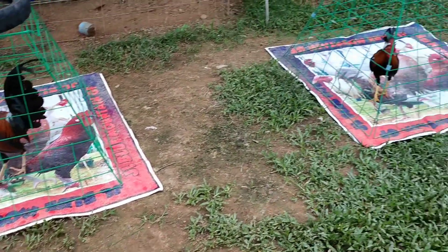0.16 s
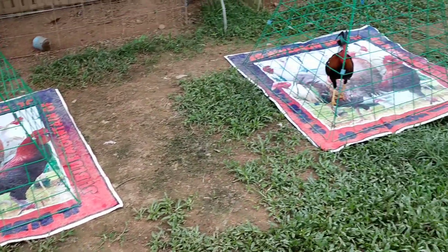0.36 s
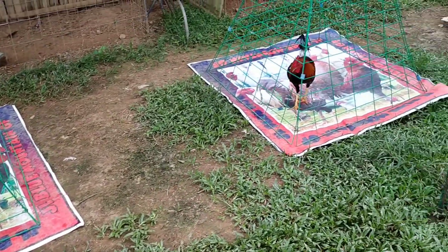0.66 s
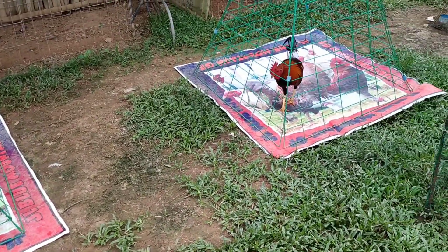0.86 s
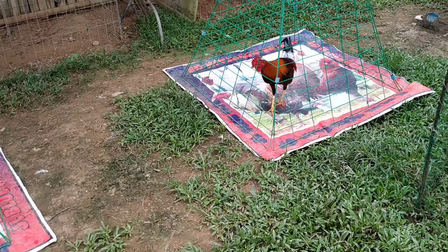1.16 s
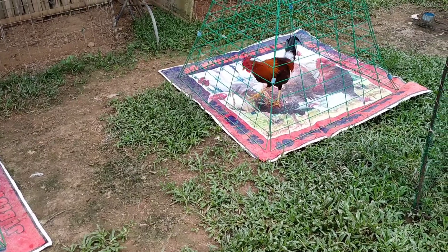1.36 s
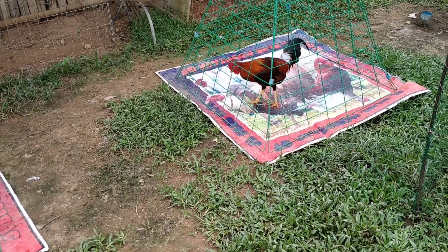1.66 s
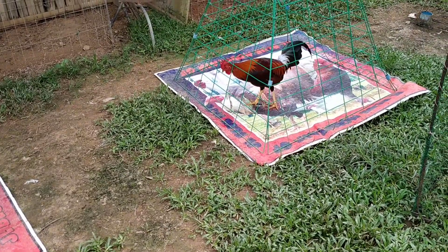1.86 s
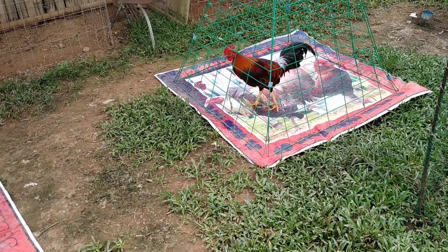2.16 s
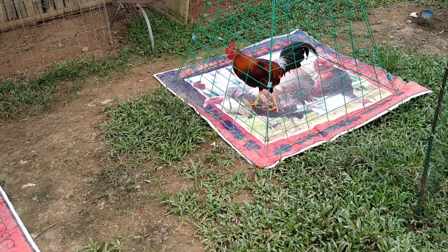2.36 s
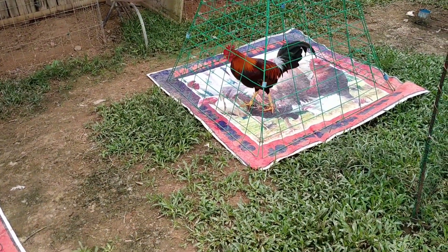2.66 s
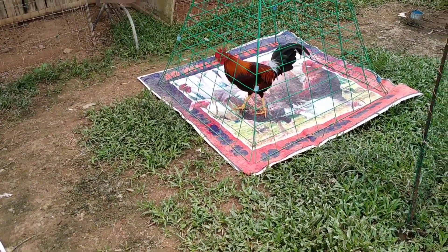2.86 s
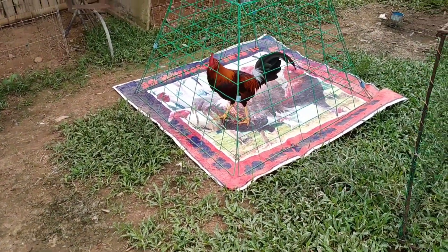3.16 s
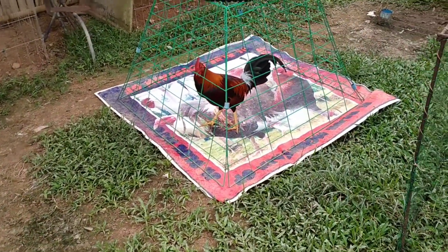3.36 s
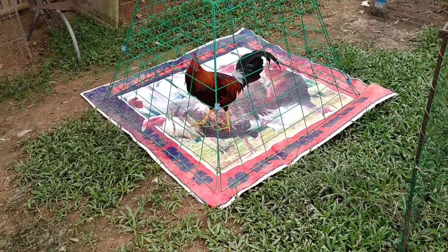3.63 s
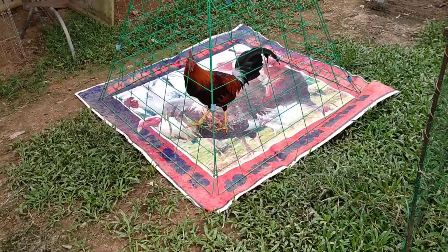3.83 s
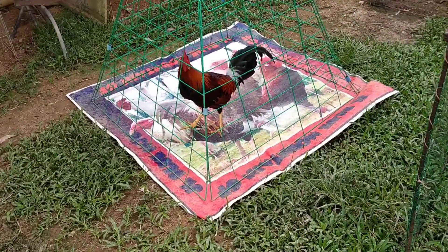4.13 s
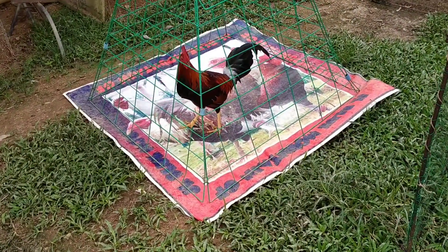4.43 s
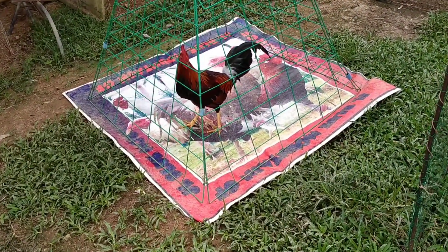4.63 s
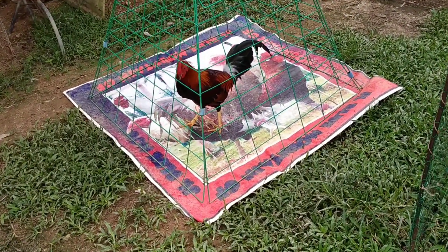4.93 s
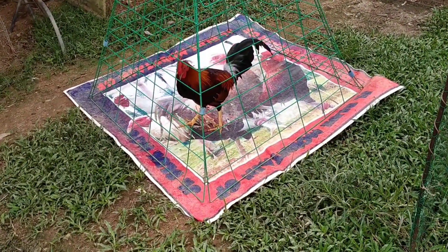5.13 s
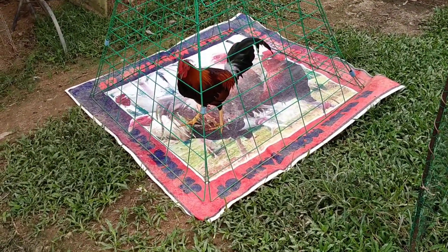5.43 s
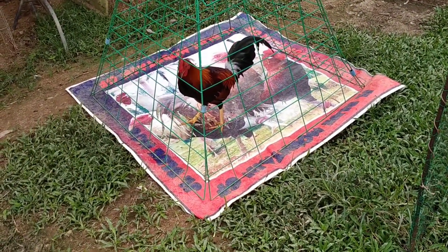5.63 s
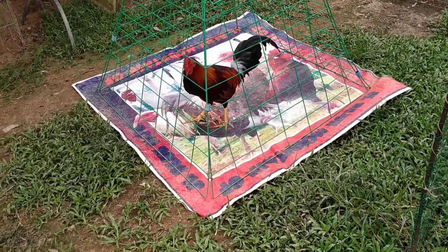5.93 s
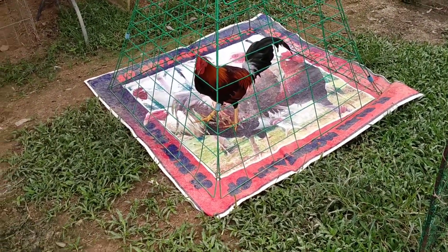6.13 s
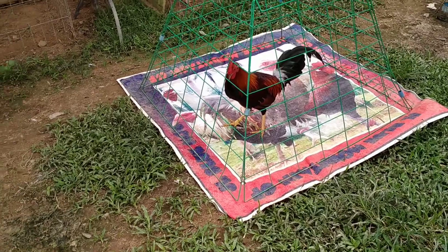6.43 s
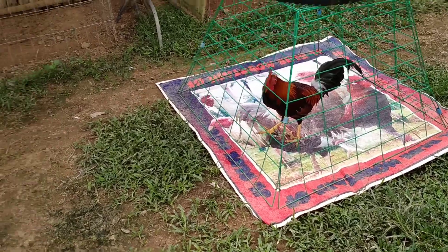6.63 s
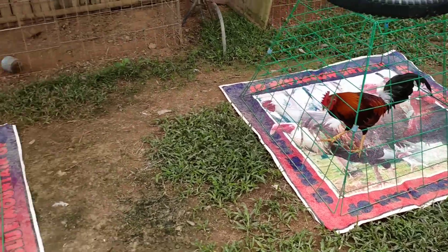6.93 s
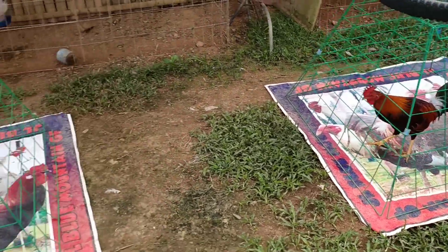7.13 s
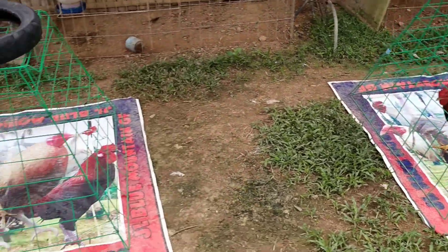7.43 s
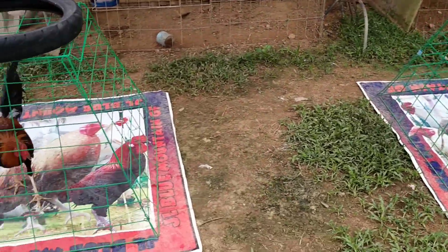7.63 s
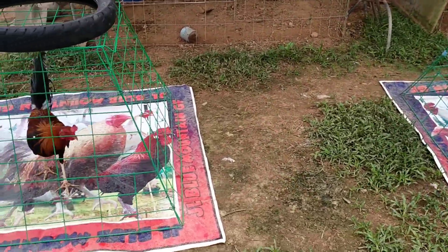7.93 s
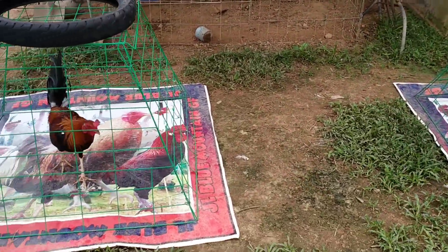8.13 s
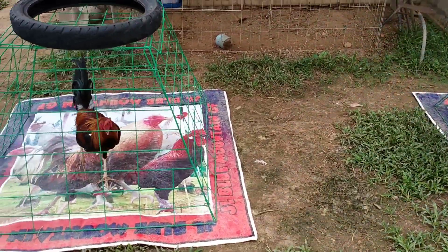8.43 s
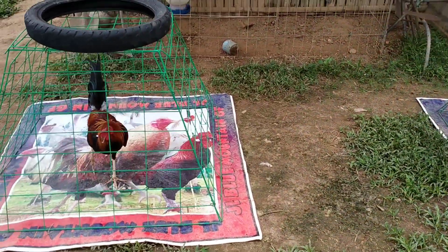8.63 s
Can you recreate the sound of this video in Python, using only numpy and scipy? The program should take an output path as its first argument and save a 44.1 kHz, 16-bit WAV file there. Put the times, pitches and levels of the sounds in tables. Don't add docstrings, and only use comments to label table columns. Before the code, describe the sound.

Outdoor yard, phone microphone a few metres from the birds, steady high insect hiss over faint air and low wind rumble. At 0.1 s a light wire knock and feathery swish, with a thin rising chirp; a distant clear fowl call at 0.5-0.8 s. From 0.8 to 2.8 s a rooster crows once, very loud: rasping, fluttering opening, a hoarse unstable middle, a clear ringing held note around 2 s, then a drop in pitch, with a short diffuse echo. Quiet follows, with soft clucks near 3 s, a dry snap and wing rustle at 3.3-3.5 s, low hen groans and short barks from 3.5 to 4.9 s. Small birds chirp upward at 4.7, 5.4, 6.6 and 7.6 s. Soft hoarse clucks repeat from 5.2 to 7.6 s, with occasional dull thumps. From 7.1 s distant fowl calls grow clearer, a nearer low groan runs 8.2-8.8 s, and small knocks land near 8.5 s.

```python
import sys
import numpy as np
from scipy import signal
from scipy.fft import rfft, irfft, next_fast_len
from scipy.io import wavfile
from scipy.ndimage import uniform_filter1d, minimum_filter1d

SR = 44100
rng = np.random.default_rng(int(sys.argv[2]) if len(sys.argv) > 2 else 0)


def waveform_to_disk(signal):
    frames = np.transpose(np.atleast_2d(signal))
    scaled = np.clip(frames, -1, 1) * 32767
    samples = np.round(scaled).astype(np.int16)
    wavfile.write(sys.argv[1], SR, samples)


def boost(x):
    u = np.asarray(x, float) / 20
    return 10 ** u


N = 387198

# (time [s], pitch [Hz], clear tone [dB], hoarse rasp [dB])
CROW_OPENING = [(.8, 897, -21, -11.5), (.93, 890, -22, -14.5), (.97, 930.6, -13, -17),
                (1.02, 969.3, -11.5, -20), (1.045, 905, -11, -17), (1.085, 1008, -11.5, -49),
                (1.12, 990.5, -9.5, -24.5), (1.155, 878, -22, -21), (1.2, 864, -37, -26)]
CROW_HOARSE = [(1.19, 865, -25, -20), (1.25, 950, -14, -15), (1.29, 912, -11, -18.5),
               (1.36, 945.7, -15.5, -16), (1.48, 963, -12.5, -21.5), (1.6, 958, -21, -20),
               (1.7, 932.6, -21.5, -14.5), (1.79, 905, -14, -12.5)]
CROW_HELD = [(1.75, 900, -16, -20.5), (1.8, 910.7, -14.5, -24.5), (1.88, 921.6, -12, -34),
             (1.97, 916.5, -12, -25.5), (2.04, 873, -19, -47)]
CROW_CLEAR = [(2.02, 869.5, -15, -29), (2.04, 870.7, -14, -23.5), (2.12, 862, -9, -31.5),
              (2.2, 851.6, -13, -23), (2.28, 843, -10, -57), (2.4, 823.4, -20, -60),
              (2.45, 816, -19.5, -40), (2.49, 788, -25, -32)]
CROW_SECOND_MEMBRANE = [(2.22, 437.4, -29.5, -16.5), (2.26, 442, -23, -33), (2.42, 439.9, -25.5, -52),
                        (2.46, 434.2, -25.5, -26.5), (2.5, 436, -26.5, -42), (2.57, 422, -28, -43),
                        (2.6, 419, -39, -45)]
CROW_FALL = [(2.59, 790, -22, -24), (2.655, 725, -18, -24), (2.68, 720, -14, -40), (2.715, 700, -17, -30),
             (2.765, 590, -31, -29), (2.79, 545, -46, -42)]
# (multiple of pitch [1], level [dB])
OPENING_ORDERS = [(1, -19.5), (2, 2), (3, -29), (4, -42), (5, -35), (6, -31), (7, -31)]
HOARSE_ORDERS = [(1, -7.5), (2, 1.5), (3, -30), (4, -32.5), (5, -35), (6, -31.5), (7, -27)]
HELD_ORDERS = [(1, -20), (2, 5.5), (3, -22), (4, -19.5), (5, -37), (6, -43), (7, -30), (10, -80)]
CLEAR_ORDERS = [(1, -8.5), (2, -1.5), (3, -16.5), (4, -33), (5, -22), (6, -42), (7, -35), (8, -47),
                (10, -66), (12, -37.5), (18, -42)]
SECOND_ORDERS = [(1, -33), (2, 3.5), (3, -1.5), (4, 10.5), (5, -3), (6, -9.5), (7, -14), (8, -25),
                 (10, -52), (13, -18.5), (18, -36)]
FALL_ORDERS = [(1, 0.5), (2, -10.5), (3, -15), (4, -17), (6, -43), (7, -47), (8, -24.5), (9, -33)]
# (multiple of pitch [1], level [dB])
HALF_ORDERS = [(1.5, -32), (2.5, -40), (3.5, -30), (4.5, -54), (5.5, -36.5), (7.5, -31), (9.5, -65),
               (13.5, -48), (17.5, -46)]
# (start [s], end [s], first pitch [Hz], last pitch [Hz], level [dB])
SIDE_TONES = [(.8, 0.823, 2160, 2507, -11), (0.815, 0.979, 1285, 1269, -23),
              (1.292, 1.396, 1210, 1430, -21), (1.301, 1.407, 573, 725, -37.5),
              (1.852, 2.032, 1768, 1734, -14.5), (2.055, 2.191, 1272, 1167, -26),
              (1.8, 2.053, 875, 878, -23),
              (0.962, 1.007, 987, 978, -26.5), (1.033, 1.079, 869, 1025, -21.5),
           (1.112, 1.155, 1010, 850, -20.5), (1.01, 1.039, 2414, 2290, -17), (1.15, 1.2, 1200, 1330, -31),
           (1.198, 1.25, 721, 950, -23), (1.404, 1.45, 1252, 1233, -22.5),
           (1.695, 1.742, 1150, 1260, -21.5), (1.721, 1.76, 720, 763.4, -20.5),
           (1.86, 1.93, 2180, 2170, -32), (1.862, 1.914, 470, 490, -45.5), (2.02, 2.046, 722, 790, -24),
           (2.598, 2.66, 1965, 1940, -24), (2.712, 2.755, 1980, 1900, -26.5), (2.19, 2.24, 1200, 1300, -28),
           (.82, .93, 1800, 1750, -18), (.86, .95, 2370, 2390, -19), (.81, .838, 3420, 3420, -30),
           (.828, .86, 2620, 2600, -22), (.965, 1.03, 2800, 2900, -31), (.965, 1.0, 3800, 3900, -40),
           (1.145, 1.175, 2420, 2380, -24), (1.2, 1.245, 2380, 2450, -24), (1.8, 1.86, 2300, 2250, -22),
           (1.95, 2.0, 2250, 2200, -27), (1.62, 1.66, 3400, 3380, -33), (1.74, 1.77, 3330, 3400, -31)]
SUM_TONES = [(1.83, 2.013, 5250, 5230, -53), (1.86, 1.994, 5620, 5600, -60), (1.863, 2.01, 6140, 6100, -50),
             (1.897, 2.033, 4400, 4330, -50)]
# (time [s], level [dB])
SWOOPS = [
    (1.54, -23),
    (1.61, -25.5),
    (1.67, -23.5),
    (1.72, -41),
]
SWOOP_S, SWOOP_FROM_HZ, SWOOP_TO_HZ = 0.044, 725, 890

# (frequency [Hz], level [dB per Hz])
CROW_THROAT = [(350, -28.5), (560, -33.5), (810, 2.5), (1050, -14.5), (1250, -3), (1520, -6.5), (1800, 5),
               (2350, -1.5), (2750, -17), (3400, -13), (3900, -42.5), (5600, -19.5), (7000, -32),
               (15000, -35.5)]
HEN_THROAT = [(290, -16.5), (681, -20.5), (850, -12.5), (1050, -4), (1500, -7), (2050, -30), (3500, -33),
              (4550, -51)]
FAR_THROAT = [(350, -18), (650, -3.5), (1200, 6.5), (2000, -2.5), (2400, -16.5), (2950, -3), (3250, -18.5),
              (4500, -49)]
# (frequency [Hz], level [dB])
HEN_VOICE = [(240, 1), (400, 0.5), (560, -10), (740, -5.5), (1100, 8), (1300, 2), (1600, -29), (3400, -31)]
NEAR_HEN_VOICE = [(240, 8), (370, -18.5), (740, -2), (1100, -0.5), (1450, -25), (2200, -22), (3400, -29)]
SHED_THROAT = [(500, -16), (670, -10), (1320, 3), (2000, -6), (2650, -31), (3300, -36)]
# (start [s], length [s], pitch [Hz], clear tone [dB], hoarse rasp [dB])
GROANS = [
    (3.855, 0.65, 394, -39.5, -31),
]
LEAD_INS = [
    (3.55, .29, 284.3, -41.5, -36.5),
    (7.93, .26, 263, -41.5, -37.5),
]
BARKS = [(3.45, 0.062, 321, -47.5, -40), (4.544, 0.085, 357, -44.5, -29), (4.62, 0.056, 320.4, -41, -45),
         (4.684, 0.077, 350, -39, -33.5), (4.81, 0.078, 327, -46, -47), (4.86, 0.046, 349, -42, -29)]
# (share of length [1], pitch ratio [1], tone [dB], rasp [dB])
GROAN_SHAPE = [(0, .92, 1.5, -5), (.18, .89, 4.5, -17), (0.229, .88, 5, -18), (.31, .98, 4, -6),
               (.4, .96, 0.5, -7), (.55, 1.01, 2.5, -4.5), (.7, 1.0, -2.5, -1), (0.922, .98, 0.5, -0.5),
               (1, .94, -13, -22)]
LEAD_SHAPE = [(0, 1.03, -3, 2.5), (0.449, .99, 1, -14), (.72, 1.0, -1.5, -2.5), (1, 1.4, -1.5, -2)]
BARK_SHAPE = [(0, 0.88, 5, -5), (0.25, 1.06, 4, 0), (0.6, 1.0, -5, 0), (.9, .92, 1, -3.5),
              (1.05, .86, -2, -22)]
# (time [s], pitch [Hz], clear tone [dB], hoarse rasp [dB])
FIRST_GROAN = [(0, 401, -47, -32), (.05, 439, -34, -30.5), (.1, 400.4, -51, -35.5), (.14, 420, -39.5, -31),
               (.22, 381, -56, -37.5), (.27, 371.8, -33.5, -30.5), (.42, 393.4, -39.5, -32),
               (.6, 390.6, -39.5, -33), (.7, 366, -47, -44)]
NEAR_GROAN = [(8.205, 362, -31, -47), (8.418, 369, -32, -39), (8.5, 391, -32, -67), (8.62, 365, -32.5, -32),
              (8.79, 364, -28.5, -43)]
# (start [s], end [s], first pitch [Hz], last pitch [Hz], level [dB])
FAR_CLEAR = [
    (8.365, 8.478, 671.7, 726, -21),
]
FAR_HOARSE = [(7.141, 7.181, 432, 427, -35), (7.363, 7.45, 813, 984, -40), (7.455, 7.49, 1016, 1018, -34),
              (7.495, 7.714, 968, 827, -36.5), (7.72, 7.756, 670, 679, -24), (8.26, 8.295, 480, 459, -19.5),
              (8.385, 8.485, 351.6, 357.7, -27.5), (8.075, 8.09, 955, 1010, -22.5),
              (7.95, 7.985, 983, 876, -29), (7.994, 8.034, 691, 697, -23), (8.028, 8.078, 924, 909, -26.5),
              (8.63, 8.668, 491.6, 471, -19), (8.7, 8.745, 482, 447, -22)]
WHISTLES = [(0.472, 0.801, 1126, 1120, -26), (0.61, 0.797, 940, 930, -45), (0.6, .797, 1710, 1800, -48.5),
            (3.365, 3.43, 1275, 970, -56), (3.385, 3.45, 1400, 1840, -62),
            (7.748, 7.947, 1173, 1119, -20.5), (8.083, 8.12, 1188, 1153, -18.5),
            (8.325, 8.356, 1740, 1770, -33), (8.299, 8.322, 1120, 1000, -20.5),
            (8.69, 8.708, 1900, 1000, -31), (8.145, 8.17, 1369, 1290, -37), (8.088, 8.13, 2400, 2340, -41),
            (.5, 0.72, 3375, 3362, -53)]
SHED_CALLS = [(6.345, 6.4, 637, 620, -33.5), (6.903, 6.93, 717, 634, -27), (6.974, 7.008, 666, 651, -30.5),
              (7.036, 7.126, 665, 669, -35)]
# (multiple of pitch [1], level [dB])
WHISTLE_ORDERS = [(1, 0.5), (2, -28), (3, -40)]
CLEAR_RASP_DB, HOARSE_RASP_DB = -25, -7.5

# (time [s], peak level [dB])
CLUCKS = [(2.965, -37.5), (3.24, -32), (5.158, -30.5), (5.381, -28.5), (5.673, -30), (5.916, -29),
          (6.206, -31), (6.518, -23.5), (6.77, -29), (7.034, -32), (7.336, -27), (7.589, -28)]
# (frequency [Hz], width [Hz], level [dB])
CLUCK_THROAT = [(715, 38, 3.5), (950, 120, -12.5), (1216, 31, 6), (1460, 490, -11.5), (2490, 71, -10)]
CLUCK_T60_S = 0.17
# (time [s], peak level [dB], pitch [Hz], overtone tilt [dB], fade T60 [s])
PIPS = [(5.719, -43, 304.6, 1.5, 0.025), (6.075, -38, 286, -2.5, 0.0084), (6.12, -43.5, 330, 0, 0.061),
        (6.779, -36, 521, -9, 0.017), (6.92, -43, 328, -2, 0.14), (7.82, -35, 356, -2, 0.046)]

# (time [s], peak level [dB], ring [Hz])
PECKS = [(0.1431, -24, 1240), (3.3303, -40, 2510), (4.2894, -25, 1027), (5.0559, -22.5, 1290),
         (8.5215, -29, 1135), (8.5594, -28, 1110)]
THUMPS = [(4.089, -37, 356), (6.239, -22, 128), (6.859, -25, 127), (8.469, -18.5, 50), (8.549, -23, 80.7)]
PECK_T60_S, THUMP_T60_S = 0.041, 0.018
# (time [s], peak level [dB])
TICKS = [
    (3.330, -27),
    (5.108, -42),
    (5.56, -41),
    (6.861, -38),
]

# (start [s], end [s], first pitch [Hz], last pitch [Hz], level [dB])
CHIRPS = [(0.177, 0.329, 4560, 6680, -44), (7.25, 7.37, 14300, 14600, -45), (3.4, 3.42, 3880, 2100, -32),
          (4.653, 4.745, 4520, 5800, -40.5), (5.376, 5.493, 4350, 6320, -36.5),
          (6.557, 6.683, 4010, 6670, -39), (7.538, 7.59, 4060, 4170, -43), (7.576, 7.655, 4200, 5570, -35),
          (7.647, 7.693, 5450, 6600, -36)]
# (time [s], level [dB])
TWEETS = [(4.515, -39), (4.745, -39), (5.277, -45), (5.305, -44), (5.498, -39)]
TWEET_S, TWEET_FROM_HZ, TWEET_TO_HZ = 0.018, 5250, 4520

# (start [s], length [s], centre [Hz], level [dB], width [octaves])
AIR_RUSHES = [(0.121, 0.4, 1930, -32.5, 0.21), (0.792, 0.15, 6500, -33, 0.11),
              (3.455, 0.065, 1230, -38, 0.44), (3.512, 0.12, 1760, -32, 0.71),
              (6.13, 0.25, 2090, -43, 0.88), (7.152, 0.47, 1690, -46.5, 0.18),
              (2.75, 0.51, 1750, -51, 0.021), (2.751, 0.64, 715, -55.5, 0.052),
              (6.329, 0.48, 1820, -49.5, 0.094), (6.5, 0.45, 1430, -51.5, .05),
              (7.584, 0.2, 1770, -40, 0.033)]
# (share of length [1], level [dB])
RUSH_SHAPE = [(0, -7.5), (.35, 0), (.65, -4), (1, -19)]

# (frequency [Hz], level [dB per Hz])
INSECTS = [(4500, -30), (5230, -22), (6300, -13), (7150, 6), (9500, 2.5), (11300, 8.5), (12500, -8),
           (15600, -17.5)]
AIR = [(88, -23), (150, -5.5), (210, -15), (477, 1.5), (1620, 10.5), (3680, -4), (6250, -1), (7000, 1.5)]
RUMBLE = [(8.8, -38), (15, 4.5), (40, -5), (65, -7), (128, -7), (300, -15), (390, -16), (660, -120)]
CRICKET = [(4300, -22), (4800, -10), (5300, 1.5), (5800, -2), (6300, -22)]
INSECT_DB, AIR_DB, RUMBLE_DB, CRICKET_DB = -38, -46.5, -50, -62.5
# (time [s], gain [dB])
FACING = [(.8, 2), (2.9, -5), (4.3, -4.5), (5.8, -8), (7.3, 1), (8.2, -0.5), (8.78, -1)]
AIR_SHARE, RUMBLE_SHARE = 0.48, 0.6
DUCK_FROM_DB, DUCK_RELEASE_S = -23.5, 0.19
INSECT_DUCK, AIR_DUCK, RUMBLE_DUCK = 0.21, -0.33, 0.72
ECHO_T60_S, ECHO_DB = .32, -10


def unit(x):
    return x / np.sqrt(np.mean(x ** 2) + 1e-18)


def curve(points, hz):
    f, db = np.transpose(points)
    return np.interp(np.log(np.maximum(hz, 1)), np.log(f), db, left=-90, right=-90)


def colour(x, points):
    size = next_fast_len(len(x))
    gain = boost(curve(points, np.fft.rfftfreq(size, 1 / SR)))
    return unit(irfft(rfft(x, size) * gain, size)[:len(x)])


def walk(n, rate):
    k = max(int(SR / rate), 1)
    held = np.repeat(rng.standard_normal(n // k + 1), k)
    return 1.3 * uniform_filter1d(uniform_filter1d(held, k), k)[:n]


def unroll(table, fade_s=0.0029):
    s, *columns = np.transpose(table)
    t = np.arange(max(int(s[0] * SR), 0), min(int(s[-1] * SR), N)) / SR
    edge = np.clip(np.minimum(t - s[0], s[-1] - t) / fade_s, 0, 1)
    return int(round(t[0] * SR)), edge, [np.interp(t, s, c) for c in columns]


def add(out, start, x):
    out[start:start + len(x)] += x[:len(out) - start]


def yard(birds):
    facing_db = np.interp(np.arange(N) / SR, *np.transpose(FACING))
    power = uniform_filter1d(birds ** 2, size=5000, origin=2300)
    over_db = np.maximum(10 * np.log10(power + 1e-9) - DUCK_FROM_DB, 0)
    keep = np.exp(-1 / (max(DUCK_RELEASE_S, .05) * SR))
    over_db = np.maximum(over_db, signal.lfilter([1 - keep], [1, -keep], over_db))
    insect_db = INSECT_DB + facing_db - INSECT_DUCK * over_db + .5 * walk(N, 16)
    air_db = AIR_DB + AIR_SHARE * facing_db - AIR_DUCK * over_db + 0.3 * walk(N, 6.7)
    rumble_db = RUMBLE_DB + RUMBLE_SHARE * facing_db - RUMBLE_DUCK * over_db + 2.8 * walk(N, 8.4)
    cricket_db = CRICKET_DB + 4.2 * walk(N, 9)
    noise = rng.standard_normal((4, N))
    insects = colour(noise[0], INSECTS) * boost(insect_db)
    air = colour(noise[1], AIR) * boost(air_db)
    rumble = colour(noise[2], RUMBLE) * boost(rumble_db)
    cricket = colour(noise[3], CRICKET) * boost(cricket_db)
    return insects + cricket + air + rumble


def wings():
    out = np.zeros(N)
    for s, length, hz, peak_db, octaves in AIR_RUSHES:
        swell = np.array(RUSH_SHAPE) * [length, 1] + [s, peak_db]
        start, edge, (db,) = unroll(swell, fade_s=0.011)
        grain = rng.standard_normal(len(db)) * boost(2.0 * walk(len(db), 159.0))
        band = [(hz * 2 ** (octaves * k), -7.0 * abs(k)) for k in range(-3, 4)]
        add(out, start, edge * boost(db + 2.5) * colour(grain, band))
    return out


def echo(x):
    t = np.arange(SR // 2) / SR
    tail = colour(rng.standard_normal(len(t)), [(200, -8.5), (800, -16.0), (3000, -9.0), (9000, -5.5)])
    tail = tail * boost(-60 * t / ECHO_T60_S) * (t > .012)
    return signal.fftconvolve(x, tail / np.sqrt(np.sum(tail ** 2)))[:N] * boost(ECHO_DB)


def pecks():
    out, t = np.zeros(N), np.arange(SR // 10) / SR
    for hits, t60 in [(PECKS, PECK_T60_S), (THUMPS, THUMP_T60_S)]:
        fade = boost(-60 * t / max(t60, .005))
        for s, db, hz in hits:
            ring = np.sin(2 * np.pi * hz * t)
            band = [(hz / 3, -20), (hz, 0), (3 * hz, -8), (6 * hz, -25)]
            crack = colour(rng.standard_normal(len(t)), band)
            add(out, int(s * SR), boost(db) * fade * (.5 * ring + 0.31 * crack))
    for s, db in TICKS:
        add(out, int(s * SR), boost(db) * boost(-60 * t / 0.005) * rng.standard_normal(len(t)))
    return out


def songbird():
    out = np.zeros(N)
    tweets = [(s, s + TWEET_S, TWEET_FROM_HZ, TWEET_TO_HZ, db) for s, db in TWEETS]
    for s0, s1, hz0, hz1, peak_db in CHIRPS + tweets:
        start, edge, (hz, db) = unroll([(s0, hz0, peak_db), (s1, hz1, peak_db - 6.5)])
        n = len(hz)
        step = np.arange(n) / SR * 38 % 1
        trill = boost(db + 1 * walk(n, 140)) * (1 - 0.61 * np.cos(np.pi * step) ** 2)
        waver = 1 + 0.0096 * np.sin(2 * np.pi * step) + 0.016 * walk(n, 212.4)
        add(out, start, edge * trill * np.sin(2 * np.pi * np.cumsum(hz * waver) / SR))
    return out


def rasp(hz, throat, jitter, throb_db, beat_hz, side_share):
    n = len(hz)
    cycles = np.cumsum(hz * np.exp(jitter * walk(n, 700)) / SR)
    closures = np.diff(np.floor(cycles), prepend=0) * boost(3.0 * rng.standard_normal(n))
    steady_phase = 2 * np.pi * np.cumsum(hz) / SR
    steady = sum(np.cos(k * steady_phase + k * k) for k in range(1, 5))
    wandering_hz = beat_hz * np.exp(.3 * walk(n, 40) + .33 * walk(n, 150))
    beat = np.sin(2 * np.pi * np.cumsum(wandering_hz) / SR)
    side_tones = colour(steady * beat, throat) * boost(4 * walk(n, 45))
    ringing = colour(closures, throat) + side_share * side_tones
    return unit(ringing * boost(throb_db * walk(n, 70.65)))


def voice(out, table, orders, throat, wobble=.004, jitter=.5, throb_db=10.5, rasp_gain_db=0, beat_hz=150,
          side_share=0.57, fade_s=0.0015, flutter_db=2.5, halves=None, pulse=0):
    start, edge, (hz, tone_db, rasp_db) = unroll(table, fade_s)
    n = len(hz)
    phase = 2 * np.pi * np.cumsum(hz * (1 + wobble * walk(n, 40 * flutter_db))) / SR
    if orders[0][0] == 1:
        gains = [boost(curve(orders, k)) for k in range(1, int(orders[-1][0]) + 1)]
    else:
        gains = [boost(curve(orders, k * hz)) for k in range(1, 10)]
        gains = gains / np.sqrt(np.sum(np.square(gains), axis=0))
    tone = np.zeros(n)
    for k, gain in enumerate(gains):
        flutter = boost(flutter_db * walk(n, 18 * flutter_db))
        tone += gain * flutter * np.sin((k + 1) * phase + k * k)
    if halves:
        for k in np.arange(1.5, 18):
            tone += boost(curve(halves, k) + 4 * walk(n, 18)) * np.sin(k * phase + k * k)
    hoarse = rasp(hz, throat, jitter, throb_db, beat_hz, side_share) * boost(rasp_db + rasp_gain_db)
    if pulse:
        hoarseness = np.clip((rasp_db - tone_db + 18) / 12, 0, 1)
        stutter = np.sin(2 * np.pi * np.cumsum(58 * np.exp(.25 * walk(n, 30))) / SR)
        edge = edge * (1 + pulse * hoarseness * stutter)
    add(out, start, edge * (np.sqrt(2) * tone * boost(tone_db) + hoarse))


def hens():
    out = np.zeros(N)
    for calls, shape in [(GROANS, GROAN_SHAPE), (LEAD_INS, LEAD_SHAPE), (BARKS, BARK_SHAPE)]:
        for s, length, hz, tone_db, rasp_db in calls:
            note = np.array(shape) * [length, hz, 1, 1] + [s, 0, tone_db, rasp_db]
            voice(out, note, HEN_VOICE, HEN_THROAT, wobble=.009, throb_db=1.5, beat_hz=90, fade_s=.009)
    voice(out, FIRST_GROAN, HEN_VOICE, HEN_THROAT, wobble=0.0241, throb_db=3.0, beat_hz=90.0)
    voice(out, NEAR_GROAN, NEAR_HEN_VOICE, HEN_THROAT, wobble=0.0096, throb_db=1.5, beat_hz=85.3)
    for calls, orders, throat, under_db in [(FAR_CLEAR, FAR_THROAT, FAR_THROAT, CLEAR_RASP_DB),
                                            (FAR_HOARSE, FAR_THROAT, FAR_THROAT, HOARSE_RASP_DB),
                                            (WHISTLES, WHISTLE_ORDERS, FAR_THROAT, -24),
                                            (SHED_CALLS, SHED_THROAT, SHED_THROAT, -13)]:
        for s0, s1, hz0, hz1, db in calls:
            rise = 1 + min(.04, .0013 / (s1 - s0))
            onset = (s0 - .006, hz0, db - 0.5, db + under_db + 2.0)
            arch = ((s0 + s1) / 2, rise * (hz0 + hz1) / 2, db - 4.5, db + under_db)
            end = (s1 + 0.0045, hz1, db - 3.0, db + under_db - 8.5)
            voice(out, [onset, arch, end], orders, throat, wobble=min(.014, .0014 / (s1 - s0)),
                  fade_s=.011, flutter_db=3.3)
    return out


def rooster():
    out = np.zeros(N)
    rough = dict(rasp_gain_db=4, throb_db=3.2, flutter_db=4, pulse=.55, fade_s=.0032)
    held = dict(rasp_gain_db=8, throb_db=2.4, flutter_db=1.2, fade_s=.0032)
    clear = dict(rasp_gain_db=7, throb_db=2.4, flutter_db=2.2, fade_s=.012, halves=HALF_ORDERS)
    late = dict(rasp_gain_db=6, throb_db=2.4, flutter_db=2.2, fade_s=.0032)
    for note, orders, wobble, manner in [(CROW_OPENING, OPENING_ORDERS, .0101, rough),
                                         (CROW_HOARSE, HOARSE_ORDERS, .013, rough),
                                         (CROW_HELD, HELD_ORDERS, .003, held),
                                         (CROW_CLEAR, CLEAR_ORDERS, .002, clear),
                                         (CROW_SECOND_MEMBRANE, SECOND_ORDERS, .0015, late),
                                         (CROW_FALL, FALL_ORDERS, .008, late)]:
        voice(out, note, orders, CROW_THROAT, wobble=wobble, beat_hz=300, side_share=1.3, **manner)
    swoops = [(s, s + SWOOP_S, SWOOP_FROM_HZ, SWOOP_TO_HZ, db) for s, db in SWOOPS]
    for s0, s1, hz0, hz1, db in SIDE_TONES + SUM_TONES + swoops:
        voice(out, [(s0, hz0, db, -60), (s1, hz1, db, -60)], [(1, 1.0), (2, -48)], CROW_THROAT,
              wobble=min(.0092, .0005 / (s1 - s0)), fade_s=0.0076)
    return out


def clucks():
    out, t = np.zeros(N), np.arange(SR // 4) / SR
    f = np.fft.rfftfreq(len(t), 1 / SR)
    throat = sum(boost(db) / (1 + ((f - hz) / width) ** 2) for hz, width, db in CLUCK_THROAT)
    envelope = np.minimum(t / 0.003, 1) * boost(-60 * np.maximum(t - .012, 0) / CLUCK_T60_S)
    for s, db in CLUCKS:
        puff = unit(irfft(rfft(rng.standard_normal(len(t))) * throat, len(t)))
        add(out, int(s * SR), 0.42 * boost(db) * envelope * puff)
    for s, db, hz, tilt_db, t60 in PIPS:
        bend = 1 + 0.059 * np.exp(-t / 0.0061) + 0.053 * walk(len(t), 195)
        phase = 2 * np.pi * np.cumsum(hz * bend) / SR
        tone = sum(boost(tilt_db * (k - 1)) * np.sin(k * phase) for k in range(1, 7))
        fade = boost(-60 * np.maximum(t - .015, 0) / max(t60, .01))
        add(out, int(s * SR), boost(db) * np.minimum(t / 0.0031, 1) * fade * tone)
    return out


def scene():
    birds = rooster() + hens() + clucks() + pecks() + songbird() + wings()
    return (birds + echo(birds) + yard(birds))[None]


def top_cut(x):
    return signal.sosfilt(signal.butter(12, 15500, fs=SR, output="sos"), x)


def record(dry):
    room = np.minimum(1, .97 / (np.abs(dry) + 1e-9))
    gain = uniform_filter1d(minimum_filter1d(room, size=301), size=151)
    return top_cut(dry * gain)


dry = scene()
out = record(dry)
waveform_to_disk(out)
```